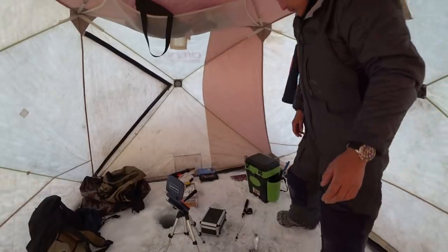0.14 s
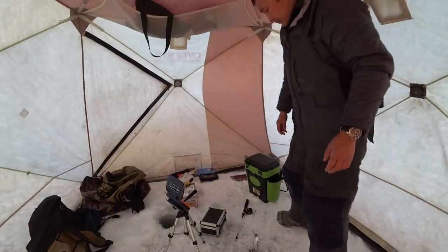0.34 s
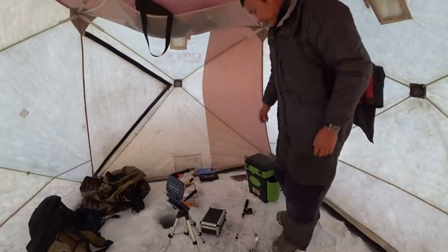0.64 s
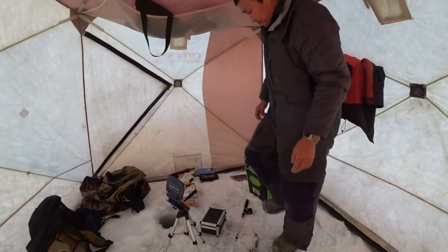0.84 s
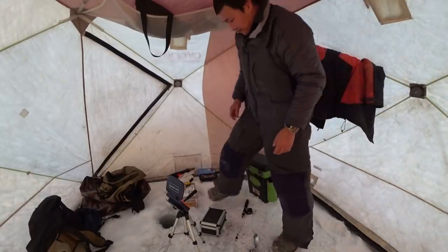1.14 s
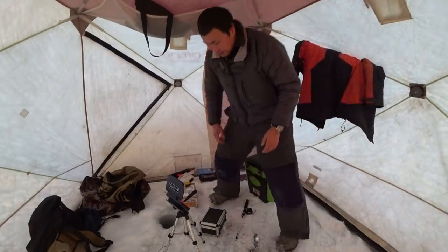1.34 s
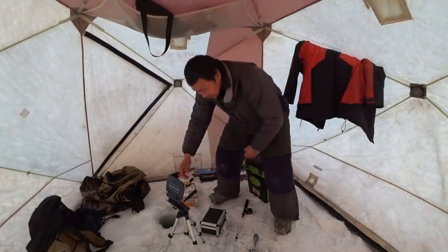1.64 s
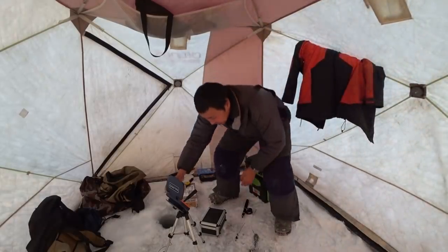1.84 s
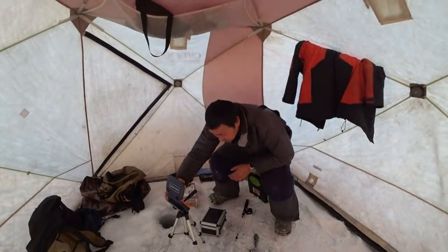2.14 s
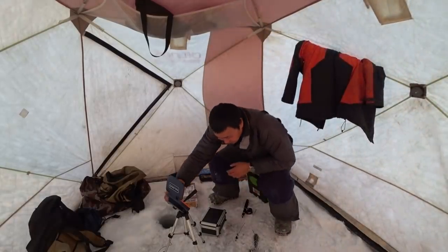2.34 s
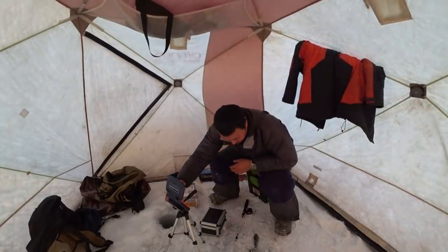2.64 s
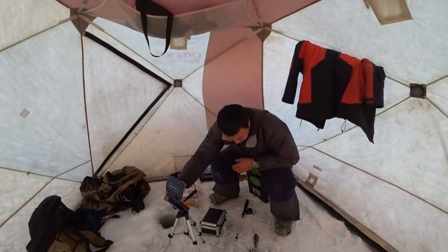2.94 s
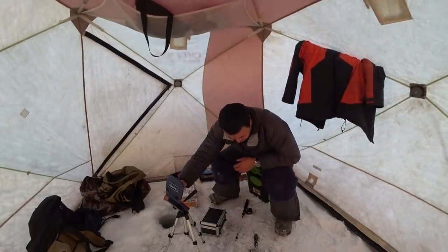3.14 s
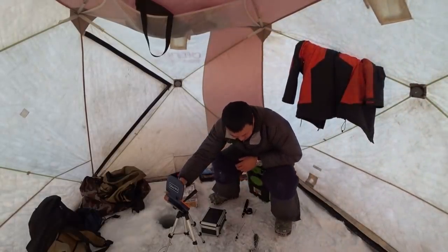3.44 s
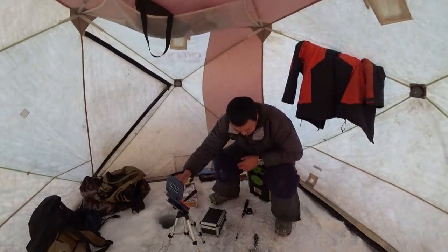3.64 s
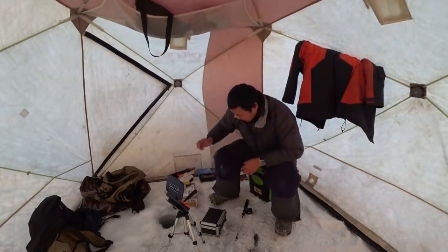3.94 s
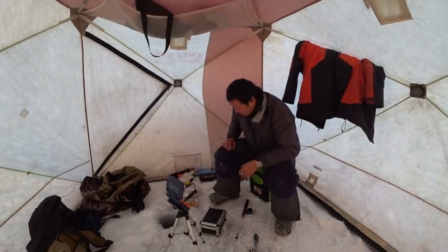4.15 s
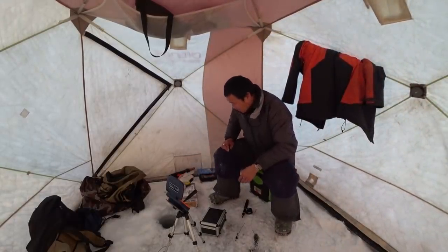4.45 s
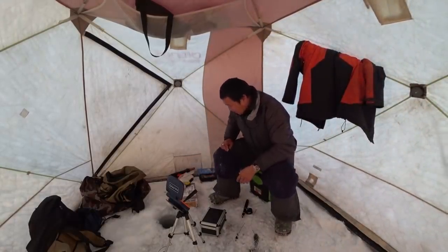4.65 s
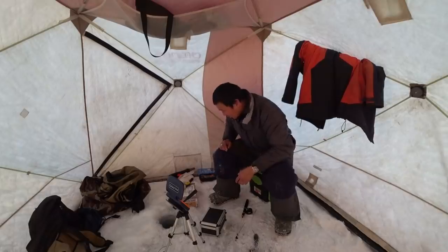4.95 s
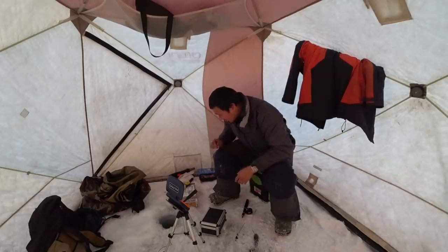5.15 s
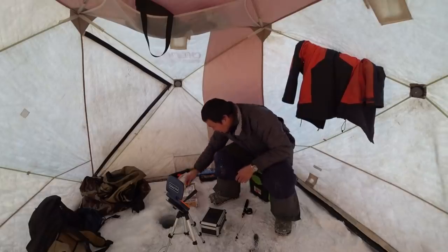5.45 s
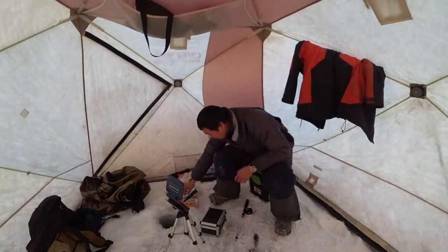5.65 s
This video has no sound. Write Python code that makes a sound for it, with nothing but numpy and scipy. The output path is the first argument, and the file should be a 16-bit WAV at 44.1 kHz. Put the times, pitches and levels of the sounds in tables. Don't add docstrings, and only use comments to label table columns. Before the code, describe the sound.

Boots crunch and creak on packed snow in a tent, then a small hard scoop scrapes and chops ringing ice as a padded jacket rustles.

```python
import sys
import numpy as np
from scipy import signal
from scipy.fft import rfft, irfft, next_fast_len
from scipy.io import wavfile
from scipy.ndimage import uniform_filter1d

SR = 44100
rng = np.random.default_rng(int(sys.argv[2]) if len(sys.argv) > 2 else 0)


def amplitude_ratio(level_db):
    exponent = np.asarray(level_db, float) / 20
    return 10 ** exponent


def waveform_to_disk(signal):
    frames = np.transpose(np.atleast_2d(signal))
    scaled = np.clip(frames, -1, 1) * 32767
    samples = np.round(scaled).astype(np.int16)
    wavfile.write(sys.argv[1], SR, samples)


N = 256220
T = np.arange(N) / SR

# start_s, left_right_db
BOOT_PLACE = [(0, -4), (1.3, -1), (1.9, -2), (3.3, -2.5), (5.8, 0.5)]


def evened(x):
    return x / np.sqrt(np.mean(x ** 2) + 1e-20)


def read(points, hz):
    f, value = np.transpose(points)
    return np.interp(np.log(hz + 1), np.log(f + 1), value)


def colour(points):
    hz = np.minimum(abs(np.fft.fftfreq(4096, 1 / SR)), 10800)
    log_gain = np.log(amplitude_ratio(np.maximum(read(points, hz), -100)))
    taps = np.fft.ifft(np.exp(np.conj(signal.hilbert(log_gain)))).real[:2048]
    return taps / np.linalg.norm(taps)


def through(x, taps):
    return signal.oaconvolve(x, taps.reshape((1,) * (x.ndim - 1) + (-1,)), axes=-1)[..., :N]


def drift(shape, size):
    return evened(uniform_filter1d(uniform_filter1d(rng.standard_normal(shape), size), size))


def grit(grain_db, clump_db, clump_s):
    clumps = drift(N, max(round(clump_s * SR), 1))
    sizes = amplitude_ratio(grain_db * np.minimum(rng.exponential(1, N), 5) + clump_db * clumps)
    return evened(sizes * rng.standard_normal((2, N)))


def patchy(x, depth_db):
    z = signal.stft(x, nperseg=256)[2]
    field = rng.standard_normal(z.shape[-2:])
    field = uniform_filter1d(field, size=3, axis=0)
    field = evened(uniform_filter1d(field, size=22, axis=1))
    return evened(signal.istft(z * amplitude_ratio(depth_db * field), nperseg=256)[1][..., :N])


def bursts(s, db, hold_s, tail, rise):
    env, t = np.zeros(N), np.arange(4000) / SR
    for at_s, level_db, hold in zip(s, db, hold_s):
        part = env[round(at_s * SR):][:4000]
        attack = np.minimum(t / (rise * hold + 0.0003), 1)
        release = np.exp(-np.maximum(t - hold, 0) / (tail * hold + 0.0009))
        part += amplitude_ratio(level_db) * (attack * release)[:len(part)]
    return env


def blows(s, db):
    clicks = np.zeros(N)
    clicks[np.round(s * SR).astype(int)] = amplitude_ratio(db)
    return np.array([clicks, np.roll(clicks, 37)])


def held(s, value):
    return value[np.maximum(np.searchsorted(s, T) - 1, 0)]


def panned(x, pan_db):
    return x[None] * amplitude_ratio(np.array([pan_db / 2, -pan_db / 2]))[:, None]


def resonate(x, hz, width_hz):
    turn = np.exp(2j * np.pi * np.cumsum(hz * np.ones(x.shape[-1])) / SR)
    r = np.exp(-np.pi * width_hz / SR)
    return 2 * (turn * signal.lfilter([1 - r], [1, -r], x * np.conj(turn) + 1e-18)).real


def swell(x, hz, width_hz):
    return resonate(resonate(x, hz, width_hz), hz, width_hz) * np.e * SR / (2 * np.pi * width_hz)


def snapping(rows, gain_db):
    rise_swings = 0.48
    out, t = np.zeros((2, N + 600)), np.arange(600) / SR
    for s, db, hz in rows:
        u = t * hz / rise_swings
        swing = np.sin(2 * np.pi * (hz * t - np.array([[0], [.25]])))
        at = round((s - rise_swings / hz) * SR)
        out[:, at:at + 600] += amplitude_ratio(db + gain_db) * u * np.exp(1 - u) * swing
    return panned(out[:, :N], np.interp(T, *np.transpose(BOOT_PLACE)))


def gestures(rows, steeper=1):
    s = np.arange(0, N / SR + .01, .001)
    peak_s, rise_s, fall_s, db = np.transpose(rows)[..., None]
    away = np.where(s < peak_s, (peak_s - s) / rise_s, (s - peak_s) / fall_s)
    drop_db = 20 * steeper * away ** 1.264
    return s, 10 * np.log10(np.sum(amplitude_ratio(db - drop_db) ** 2, axis=0) + 1e-14)


def bites():
    # start_s, ring_db, grit_db, contact_s
    catches = [(2.391, -52, -50, 0.012), (2.417, -34, -30.5, 0.0052), (2.457, -25, -33.5, 0.0089),
               (2.499, -19.5, -36.5, 0.0043), (2.526, -31, -37.5, 0.0094), (2.541, -24, -33, 0.0049),
               (2.675, -24, -40.5, 0.0043), (2.779, -17.5, -28.5, 0.0089), (2.879, -15.5, -35.5, 0.0081),
               (2.904, -24.5, -41, 0.014), (2.931, -19.5, -32.5, 0.016), (2.966, -20, -30, 0.01),
               (2.999, -14.5, -31.5, 0.0089), (3.08, -24.5, -36, 0.0061), (3.175, -22, -36.5, 0.0047),
               (3.367, -21, -31, 0.011), (3.442, -21.5, -31, 0.0084), (3.493, -19, -29, 0.01),
               (3.626, -30, -30.5, 0.013), (3.647, -22, -27.5, 0.018), (3.67, -16.5, -28, 0.014),
               (3.698, -13.5, -27, 0.0069), (3.749, -18.5, -31.5, 0.0084), (3.805, -17.5, -32, 0.012),
               (3.946, -43, -26.5, 0.0079), (4.2, -20, -28.5, 0.029), (4.382, -39, -32.5, 0.011),
               (4.404, -27, -27.5, 0.0049), (4.466, -14, -27, 0.0072)]
    # start_s, ring_db, grit_db, contact_s
    chops = [(4.606, -12, -32.5, 0.016), (4.674, -12.5, -31.5, 0.014), (4.698, -19.5, -41, 0.01),
             (4.728, -14.5, -31, 0.014), (4.749, -18.5, -38.5, 0.013), (4.787, -36, -46.5, 0.014),
             (4.855, -12.5, -29, 0.016), (4.894, -10, -27, 0.017), (4.924, -7.5, -25.5, 0.015),
             (4.954, -4.5, -23, 0.015), (5.006, -6, -20, 0.016), (5.222, -36, -33.5, 0.0091)]
    # start_s, left_right_db
    scoop_place = [(2.5, -2), (2.7, 0.5), (3.75, -1), (4.7, 0)]
    s, ring_db, grit_db, contact_s = np.transpose(catches + chops)
    return s, ring_db, grit_db, contact_s, np.interp(s, *np.transpose(scoop_place))


def scoop():
    # peak_s, rise_s, fall_s, ring_db
    drags = [
        (2.43, 0.039, 0.15, -30),
        (2.8, 0.3, 0.72, -34),
        (3.01, 0.019, 0.012, -29),
        (3.19, 0.065, 0.024, -34.5),
        (3.23, 0.015, 0.3, -45.5),
        (3.54, 0.27, 0.04, -34),
        (3.69, 0.13, 0.097, -28),
        (3.82, 0.13, 0.33, -31.5),
        (4.22, 0.8, 0.16, -32.5),
        (4.54, 0.48, 0.057, -30),
    ]
    # pitch_hz, width_hz, level_db
    modes = [(262, 60, -21), (345.6, 38, -18), (930, 90, -0.5), (1440, 78, -3), (1820, 580, -15),
             (2440, 40, -19), (2600, 70, -12), (3110, 72, -22.5)]
    # pitch_hz, level_db
    bed = [(200, -36), (350, -34.5), (600, -21), (1200, -22.5), (2000, -21), (3000, -27), (4500, -47)]
    s, ring_db = gestures(drags)
    drag = grit(2.6, 1.9, 0.0055) * amplitude_ratio(np.interp(T, s, ring_db - 6.0))
    s, ring_db, _, contact_s, pan_db = bites()
    pan_db = held(s, pan_db)
    bite = grit(5.7, 0.69, 0.0026) * bursts(s, ring_db - 15.0, 0.66 * contact_s, 0.97, 0.02)
    rub = panned(drag + bite, pan_db)
    stir = panned(drag + 0.18 * bite, pan_db)
    push = bursts(s, ring_db - 7.5, 0.6 * contact_s, 0.27, 0.87)
    push += bursts(s, ring_db - 25.5, 0.62 * contact_s, .24, 0.11)
    dig = panned(uniform_filter1d(push, size=90)[None], pan_db)
    out = amplitude_ratio(-2) * through(rub, colour(bed))
    luck = rng.random((len(s), len(modes), 3))
    for k, (hz, width_hz, db) in enumerate(modes):
        pitch, phase, strength = [held(s, column) for column in luck[:, k].T]
        turns = np.cumsum(hz * (1 + .012 * (pitch - .5))) / SR + phase
        tone = np.cos(2 * np.pi * (turns + np.array([[0], [.25]]))) * amplitude_ratio(3 * (strength - .5))
        slow = np.exp(-1.2 * np.pi * width_hz / SR)
        ring = signal.lfilter([1 - slow], [1, -slow], dig) * tone
        rubbed = amplitude_ratio(-22.5) * swell(stir, hz * (1 + .07 * (pitch - .5)), 2.08 * width_hz)
        out += amplitude_ratio(db) * (ring + (-1) ** k * rubbed)
    return out


def ice_chips():
    # start_s, peak_db, pitch_hz
    chips = [(2.4197, -11, 5330), (2.4625, -13, 2310), (2.5034, -13, 2240), (2.5285, -11.5, 2720),
             (2.5952, -22, 2010), (2.6779, -18, 2270), (2.7821, -10, 2720), (2.7863, -16, 2110),
             (2.9356, -12.5, 3820), (2.9714, -17, 4080), (3.0026, -12, 2490), (3.4451, -28, 6900),
             (3.6308, -14, 5600), (3.6561, -16, 6450), (3.6741, -19, 4200), (3.6788, -12, 4670),
             (3.7, -19, 2930), (3.7554, -17, 4780), (3.8347, -11, 2590), (4.1378, -12, 3500),
             (4.3845, -24, 3800), (4.3888, -9, 5700), (4.4083, -14, 4940), (4.469, -12, 4830),
             (4.5371, -20, 3040), (4.607, -22, 2330), (4.6111, -22, 2420), (4.6751, -19, 3900),
             (4.6797, -7, 5400), (4.7372, -12, 2340), (4.8566, -26, 3490), (4.8628, -18, 2470),
             (4.9006, -17, 7180), (4.9285, -21, 3070), (4.9588, -18, 3060), (5.0107, -1, 3160),
             (5.0135, -11, 2880)]
    return snapping(chips, -4.5)


def squeak():
    # start_s, pitch_hz, level_db
    glide = [
        (4.15, 876, -62),
        (4.184, 888, -52),
        (4.224, 909, -35),
        (4.26, 928, -38),
        (4.319, 885, -35),
        (4.37, 890, -41),
        (4.405, 904, -34),
        (4.435, 910, -62),
    ]
    # multiple, level_db
    orders = [(1, -0.5), (2, 1), (3, -5), (4, -11)]
    s, hz, db = np.transpose(glide)
    wobble, tremble = drift((2, 2, N), 120)
    turns = np.cumsum(np.interp(T, s, hz) * (1 + .05 * wobble), axis=1) / SR
    tone = sum(amplitude_ratio(order_db) * np.cos(2 * np.pi * k * turns) for k, order_db in orders)
    return (tone * amplitude_ratio(np.interp(T, s, db, left=-120, right=-120) + 2.1 * tremble))[None]


def slides():
    # peak_s, rise_s, fall_s, level_db, centre_hz
    slide_rows = [(0.66, .01, 0.018, -35, 4100), (0.78, 0.025, 0.21, -49, 1140),
                  (0.81, 0.24, 0.18, -44.5, 1950), (1.308, 0.022, 0.093, -26.5, 1013),
                  (1.28, 0.009, 0.16, -35, 2080), (0.74, .04, 0.13, -50, 1100),
                  (0.82, 0.28, 0.12, -46.5, 2820), (2.7, 0.023, 0.027, -40, 2530),
                  (2.4, 0.026, 0.018, -54, 2750), (3.18, 0.041, 0.045, -45.5, 2650),
                  (1.66, 0.14, 0.48, -44, 3870), (3.63, .04, 0.071, -30, 2370),
                  (3.68, 0.065, 0.069, -29, 886), (2.426, 0.036, 0.16, -37, 1520),
                  (3.83, 0.13, 0.076, -32.5, 2630), (4.204, 0.15, 0.12, -30.5, 1820),
                  (4.469, 0.092, 0.062, -29.5, 876), (4.53, 0.054, .05, -33.5, 920),
                  (4.49, 0.051, 0.036, -32.5, 1400), (5.229, 0.011, 0.0091, -35, 2740)]
    rub, out = grit(0.28, 0.99, 0.0016), np.zeros((2, N))
    for *row, hz in slide_rows:
        peak_s, rise_s, fall_s, _ = row
        part = slice(round((peak_s - 2 * rise_s) * SR), round((peak_s + 2 * fall_s) * SR))
        band = evened(swell(rub[:, part], hz, 0.25 * hz))
        out[:, part] += band * amplitude_ratio(np.interp(T[part], *gestures([row])))
    return out[None]


def moves():
    # peak_s, rise_s, fall_s, hiss_db, crunch_db
    steps = [(.27, 0.088, 0.064, -44, -38.5), (0.331, 0.23, 0.14, -47, -34.5),
             (.512, 0.18, 0.28, -51.5, -55.5), (0.592, 0.031, 0.033, -50.5, -44.5),
             (.64, 0.016, 0.22, -39.5, -33), (.7, 0.14, 0.23, -44.5, -34.5), (.83, 0.14, 0.16, -47, -49.5),
             (1.0, 0.68, 0.41, -53, -49.5), (1.094, 0.0082, 0.07, -48.5, -54),
             (1.176, 0.067, 0.053, -52, -55), (1.262, 0.23, 0.016, -46.5, -50),
             (1.276, 0.0091, 0.2, -31, -26), (1.349, 0.14, 0.15, -55, -25), (1.53, 0.092, 0.27, -41.5, -42),
             (1.641, 0.073, 0.079, -37.5, -29.5), (1.68, 0.24, 0.49, -39, -49),
             (1.736, 0.11, 0.17, -45, -35), (1.87, 0.45, 0.22, -44.5, -48), (2.172, 0.73, 0.15, -49, -47),
             (2.32, 0.35, 0.41, -48, -52)]
    # peak_s, rise_s, fall_s, hiss_db, crunch_db
    strokes = [(2.39, 0.031, .1, -53, -36), (2.434, 0.06, 0.066, -30.5, -34), (2.544, 0.1, .05, -43, -62),
               (2.708, 0.12, 0.079, -38, -31.5), (2.784, 0.022, 0.034, -36, -22.5),
               (2.82, 0.069, 0.4, -38.5, -38), (2.995, 0.42, 0.074, -36.5, -32),
               (3.15, 0.27, 0.99, -49, -45.5), (3.374, 0.025, 0.039, -38, -32.5),
               (3.509, 0.2, 0.2, -35.5, -31), (3.635, 0.077, 0.18, -28.5, -28),
               (3.791, 0.43, 0.22, -43, -27.5), (3.851, 0.039, 0.43, -28.5, -28.5),
               (4.1, 0.17, 0.16, -28.5, -30), (4.22, 0.83, 0.048, -30.5, -29.5), (4.29, .2, 0.13, -67, -41),
               (4.388, 0.011, 0.14, -34.5, -31.5), (4.433, 0.0045, 0.024, -35, -39),
               (4.45, 0.037, 0.12, -30.5, -45), (4.54, 0.16, 0.021, -32, -29),
               (4.702, 0.19, 0.36, -50.5, -46), (5.0, 0.17, 0.081, -37, -38)]
    # peak_s, rise_s, fall_s, hiss_db, crunch_db
    settles = [
        (5.17, 0.088, 0.18, -48, -47),
        (5.225, 0.053, 0.12, -49, -51),
        (5.35, 0.21, 0.86, -58, -52.5),
        (5.488, 0.046, 0.35, -51, -50),
        (5.594, 0.004, 0.056, -68, -45),
        (5.776, 0.58, 0.11, -49.5, -47),
    ]
    rows = np.array(steps + strokes + settles)
    s, hiss_db = gestures(rows[:, :4])
    _, crunch_db = gestures(rows[:, [0, 1, 2, 4]], 1.85)
    return s, np.maximum(hiss_db, -67), np.maximum(crunch_db, -65)


def creaks():
    # start_s, crunch_db, hiss_db, centre_hz
    creak_rows = [(0.085, -45.5, -64, 1270), (0.184, -39, -44.5, 630), (.499, -37, -50, 1240),
                  (.513, -37, -38, 670), (0.585, -35, -48, 990), (0.641, -48, -35, 966),
                  (.673, -25, -36, 1130), (0.746, -29, -48, 1100), (0.81, -41, -37, 990),
                  (0.886, -44, -58, 450), (0.915, -42, -60, 400), (0.934, -44.5, -60, 500),
                  (0.946, -42, -56, 700), (.975, -31.5, -60, 880), (1.033, -37.5, -44, 790),
                  (1.06, -40.5, -56, 900), (1.093, -30, -53, 814), (1.168, -37.5, -56.5, 875),
                  (1.21, -40, -58.5, 790), (1.232, -44, -53, 1030), (1.27, -21.5, -18, 935),
                  (1.293, -29, -28, 950), (1.514, -32, -54, 1440), (1.559, -31.5, -38, 477),
                  (1.622, -28.5, -27, 706), (1.635, -28, -32, 1050), (1.724, -35, -50, 680),
                  (1.886, -38, -43, 800), (1.905, -29.5, -47, 885), (1.933, -39.5, -55, 800),
                  (1.97, -34, -61, 614), (1.996, -41, -63, 970), (2.009, -40, -58, 690),
                  (2.047, -42.5, -45, 680), (2.08, -39, -56, 700), (2.099, -39.5, -56, 900),
                (2.125, -28.5, -37, 750), (2.164, -32.5, -28.5, 1195), (2.238, -36, -57, 775),
                (2.283, -46, -29.5, 1190), (2.592, -38.5, -57, 970), (3.042, -33, -47, 750),
                (3.069, -35, -42, 1470), (3.115, -42, -49, 795), (3.145, -30, -50.5, 780),
                (3.2, -36, -56, 776), (3.233, -27.5, -35, 1170), (3.254, -32.5, -40, 787),
                (3.298, -35.5, -40.5, 736), (3.339, -28.5, -35, 815), (3.404, -29.5, -32, 860),
                (5.49, -37, -32, 905), (5.591, -30, -28, 610), (5.691, -53, -35, 980)]
    s, crunch_db, hiss_db, hz = np.transpose(creak_rows)
    length_s = np.full(len(s), 0.0058)
    return s, crunch_db, hiss_db, hz, length_s, np.interp(s, *np.transpose(BOOT_PLACE))


def boots():
    # pitch_hz, level_db_per_hz
    crunch = [(35, -26), (60, -51), (204, -24.5), (306, -10.5), (468, -18), (629, -8), (730, -9), (945, -6),
              (1080, -8.5), (2430, -16), (5000, -28), (6500, -34), (11000, -120)]
    s, _, crunch_db = moves()
    crunch_db = crunch_db - np.where(s > 2.385, 5.5, 2.5)
    steady = panned(grit(2.8, 1.3, .003) * amplitude_ratio(np.interp(T, s, crunch_db)), np.full(N, -1.5))
    s, crunch_db, _, hz, length_s, pan_db = creaks()
    hz, pan_db = held(s, hz), held(s, pan_db)
    slip_env = bursts(s, crunch_db - 8.0, 1.27 * length_s, 0.53, 0.012)
    slips = panned(grit(1.9, 3.4, 0.0013) * slip_env, pan_db)
    snaps = panned(blows(s + 0.0003, crunch_db), pan_db)
    out = through(steady + 0.74 * slips, colour(crunch)) + resonate(steady, 1150, 410)
    out += amplitude_ratio(15.5) * resonate(resonate(slips, hz, 480), hz, 480)
    out += amplitude_ratio(-23.0) * swell(snaps, hz, 200)
    out += amplitude_ratio(-4.5) * swell(snaps, 770, 760)
    return out + amplitude_ratio(-12.0) * swell(snaps, 318, 120)


def thuds():
    # start_s, thud_db
    landings = [(0.637, -58), (1.271, -40), (1.621, -49), (2.42, -52), (2.776, -44), (3.338, -66),
                (3.443, -53), (4.609, -52), (4.955, -66), (5.007, -69), (5.591, -57)]
    s, thud_db = np.transpose(landings)
    return amplitude_ratio(11.5) * swell(blows(s, thud_db)[None], 110, 113)


def crystals():
    # start_s, peak_db, pitch_hz
    snap_rows = [(0.1897, -35, 1140), (0.5925, -40, 1240), (0.639, -23, 1710), (0.651, -29, 1400),
                 (0.6744, -35, 1250), (0.6796, -14.5, 2200), (0.6856, -26, 1420), (0.7207, -20, 1700),
                 (0.749, -16.5, 1800), (0.753, -28, 1270), (0.8128, -19, 2300), (0.977, -35, 1300),
                 (1.0938, -24, 940), (1.1729, -37, 1070), (1.2714, -29, 1500), (1.2773, -4.5, 1670),
                 (1.2824, -9, 1440), (1.2961, -15, 1100), (1.3042, -17, 1160), (1.324, -12, 1170),
                 (1.354, -24, 1590), (1.3673, -22, 1100), (1.3731, -29, 1050), (1.383, -20, 1620),
                 (1.3882, -18, 1100), (1.4054, -33, 1220), (1.623, -22, 1910), (1.6269, -20, 1970),
                 (1.646, -21, 1430), (1.6536, -24, 1450), (1.8947, -41, 910), (1.9102, -40, 1040),
                 (1.9706, -39, 874), (2.128, -34, 990), (2.1329, -23, 945), (2.1657, -22, 1360),
                 (2.1704, -26, 1160), (2.2827, -22, 1990), (2.2877, -27.5, 1560), (3.0853, -24, 1810),
                 (3.1484, -30, 920), (3.154, -30, 1040), (3.1812, -18.5, 1270), (3.2384, -29, 1480),
                 (3.2411, -23, 1230), (3.2548, -25, 960), (3.261, -31, 1070), (3.301, -30, 900),
                 (3.307, -39, 1010), (3.3392, -28, 990), (3.345, -22.5, 1000), (3.3737, -35, 1390),
                 (3.378, -24, 1130), (3.4054, -24, 895), (3.411, -24, 1100), (5.2286, -31, 2470),
                 (5.4914, -36, 1070), (5.5925, -30, 1540), (5.5968, -38, 1260)]
    return snapping(snap_rows, -1.5)


def knocks():
    # start_s, peak_db, pitch_hz
    knock_rows = [(1.271, -26.5, 313), (1.888, -35, 685), (1.889, -31, 990), (1.907, -32, 726),
                  (1.970, -41, 576), (2.049, -45, 870), (2.126, -32.5, 678), (2.127, -35, 924),
                  (2.125, -38, 356), (2.164, -35, 600), (2.164, -37, 1304), (3.234, -25, 1250),
                  (3.339, -40, 760), (3.404, -38, 840), (5.5912, -34.5, 647), (5.5915, -39, 1330),
                  (5.5912, -41, 327), (5.593, -44, 850)]
    out = np.zeros((2, N))
    for s, db, hz in knock_rows:
        at = round(s * SR)
        clicks = np.eye(40, 2000)[[0, 9]]
        out[:, at:at + 2000] += swell(amplitude_ratio(db) * clicks, hz, 115)
    return out[None]


def jacket():
    # pitch_hz, level_db_per_hz
    hiss = [(710, -24.5), (1200, -14), (1530, -0.5), (1660, -6), (1840, -6), (3300, -7), (4230, -6.5),
            (5440, -6), (7810, -4), (11000, -9.5), (14300, -38), (22000, -120)]
    s, hiss_db, _ = moves()
    cloth = patchy(grit(1.1, 1.5, 0.0057), 1.5) * amplitude_ratio(np.interp(T, s, hiss_db + 2.0))
    out = panned(cloth, np.full(N, 0.23))
    s, _, hiss_db, _, length_s, pan_db = creaks()
    flares = bursts(s, hiss_db - 4.5, 0.5 * length_s, 1.0, 0.11)
    out += panned(grit(3.7, 1.9, 0.0012) * flares, held(s, pan_db))
    s, _, grit_db, contact_s, pan_db = bites()
    flares = bursts(s, grit_db + 4.5, 0.6 * contact_s, .42, 0.08)
    out += panned(patchy(grit(4.7, 0.54, 0.0025), 0.7) * flares, held(s, pan_db))
    return through(out, colour(hiss))


def rumble():
    s, _, crunch_db = moves()
    stir = swell(grit(0.72, 1.5, 0.0057), 107, 75)
    return evened(stir)[None] * amplitude_ratio(0.33 * np.interp(T, s, crunch_db) - 46.0)


def tent(x):
    # pitch_hz, t60_s
    decay = [(200, .08), (1000, .065), (4000, .07), (10000, .06)]
    taps = np.zeros(8192)
    taps[np.arange(200, 8160, 20) + rng.integers(0, 20, 398)] = rng.choice([-1., 1.], 398)
    hz, t, z = signal.stft(taps, SR, nperseg=256)
    tail = signal.istft(z * amplitude_ratio(-60 * t / read(decay, hz)[:, None]), SR, nperseg=256)[1]
    return through(x, tail / np.linalg.norm(tail))


def air_floor():
    # pitch_hz, level_db_per_hz
    floor = [(24, -84), (40, -6), (1160, 4.5), (1250, 5.5), (1700, 5), (3060, 2.5), (3450, -4),
             (4360, -2.5), (8850, -18), (10200, 0), (11200, -11.5), (14600, -77), (22000, -120)]
    return through(rng.standard_normal((2, N)), colour(floor)) * amplitude_ratio(-56)


def ports(x):
    # pitch_hz, left_right_likeness
    likeness = [(60, 0.42), (250, 0.98), (600, 0.9), (1300, 0.69), (2500, 0.64), (5000, 0.8), (11000, 0.68)]
    # pitch_hz, left_lead_rad
    lead = [(0, 0), (500, .4), (1290, .7), (2500, .6), (4650, .45), (8000, .25), (11900, .1)]
    size = next_fast_len(N)
    hz = np.fft.rfftfreq(size, 1 / SR)
    same = np.clip(read(likeness, hz), 0, 1)
    shared, own = rfft(x[1], size)
    right = (same * shared + np.sqrt(1 - same ** 2) * own) * np.exp(-1j * read(lead, hz))
    return np.array([x[0, 0], irfft(right, size)[:N]])


def scene():
    tool = scoop() + ice_chips() + squeak() + slides()
    snow = boots() + thuds() + crystals() + knocks()
    near = tool + snow + jacket() + rumble()
    return ports(near + amplitude_ratio(-12.0) * tent(near) + air_floor())


def band_limit(x):
    return signal.sosfilt(signal.butter(12, 12320, fs=SR, output="sos"), x)


def record(dry):
    high_pass = signal.butter(4, 235, "high", fs=SR, output="sos")
    thin = signal.sosfilt(high_pass, dry) + amplitude_ratio(-23.0) * dry
    low_pass = signal.firwin(255, 11060, window=("kaiser", 7), fs=SR)
    narrow = signal.oaconvolve(thin, low_pass[None], "same")
    mix = np.tanh(0.51 * narrow) / 0.69
    return band_limit(mix)


dry = scene()
out = record(dry)
waveform_to_disk(out)
```